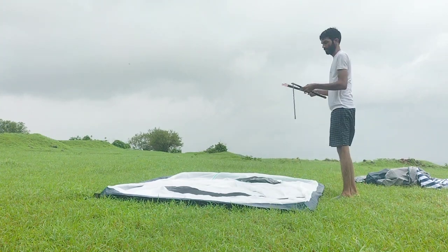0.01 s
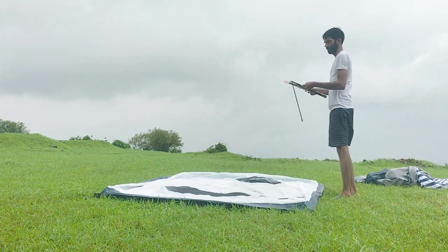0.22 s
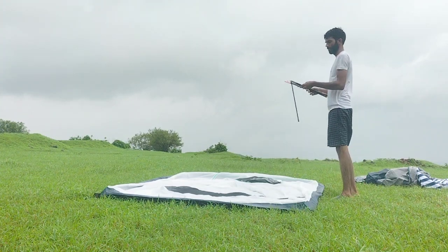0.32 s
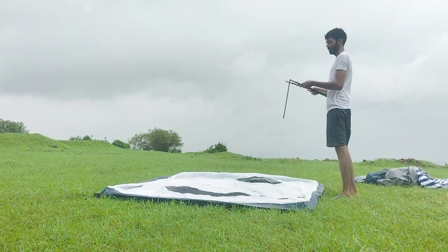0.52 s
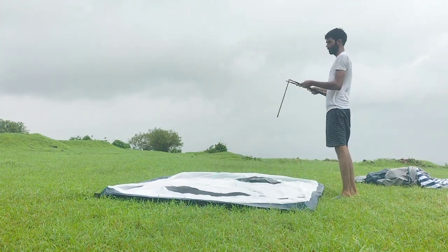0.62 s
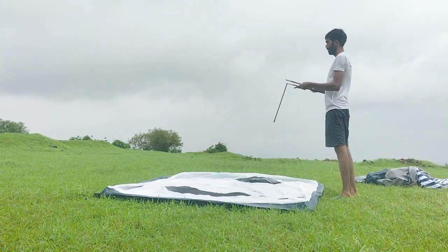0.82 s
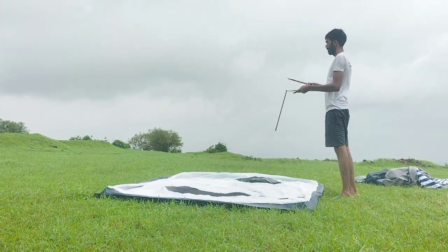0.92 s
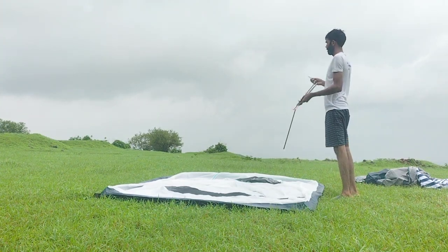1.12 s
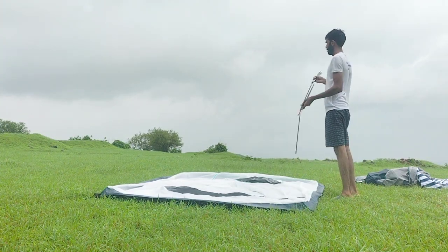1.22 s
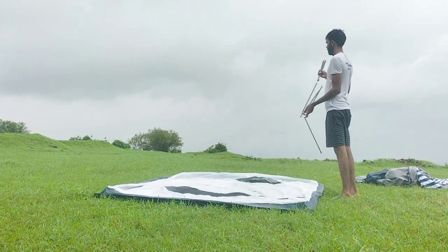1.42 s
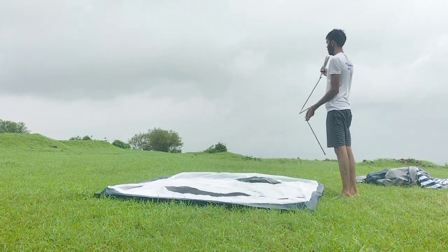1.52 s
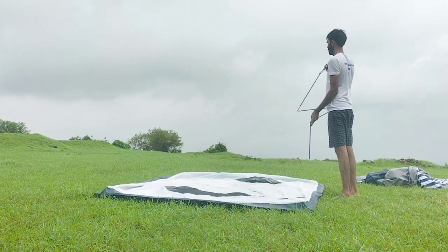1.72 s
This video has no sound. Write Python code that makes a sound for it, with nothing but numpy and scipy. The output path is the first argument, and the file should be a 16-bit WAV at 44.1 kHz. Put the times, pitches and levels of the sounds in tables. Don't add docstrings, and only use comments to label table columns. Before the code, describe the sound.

A sharp, quickly damped click of tent pole tubes with small ticks around it, outdoors at a few metres. A low rumbling wind buffet comes first, and faint bird twitters follow over quiet airy hiss.

```python
import sys
import numpy as np
from scipy import signal
from scipy.fft import rfft, irfft
from scipy.io import wavfile

SR = 44100
rng = np.random.default_rng(int(sys.argv[2]) if len(sys.argv) > 2 else 0)


def volts_from_decibels(level):
    exponent = np.asarray(level, float) / 20
    return 10 ** exponent


def transcribe(u):
    v = np.clip(np.atleast_2d(u).T, -1, 1)
    q = np.round(v * 32767).astype(np.int16)
    wavfile.write(sys.argv[1], SR, q)


N = 79380


def rms_one(x):
    return x / np.sqrt(np.mean(x ** 2) + 1e-20)


def drift(rate):
    step = 40
    r = np.exp(-2 * np.pi * rate * step / SR)
    chance = rng.standard_normal(N // step + 2002)
    slow = signal.lfilter([1], [1, -2 * r, r * r], chance)[2000:]
    return np.interp(np.arange(N) / step, np.arange(len(slow)), rms_one(slow))


def cut(x, hz, kind, order):
    return signal.sosfilt(signal.butter(order, hz, kind, fs=SR, output="sos"), x)


def banded(spectrum, top_hz, patchy_db):
    hz, level_db = np.transpose(spectrum)
    edges = 25 * 2 ** (np.arange(30) / 3)
    white = rng.standard_normal((2, N + SR // 4))
    together = drift(8.4)
    out = 0
    for k, (low, high) in enumerate(zip(edges, edges[1:])):
        if low < top_hz:
            band_pass = signal.butter(2, [low, high], "band", fs=SR, output="sos")
            band = signal.sosfilt(band_pass, white[k % 2])[-N:]
            band_db = np.interp(np.log(low * high) / 2, np.log(hz), level_db)
            flicker = 0.43 * together + drift(9.7)
            out = out + band * volts_from_decibels(band_db + patchy_db * flicker)
    return rms_one(out)


# frequency in Hz, level in dB per Hz.
FIELD_SPECTRUM = [(40, -7.5), (150, -1.5), (330, -3.5), (700, -13.5), (1200, -10.5), (1900, -19),
                  (2700, -14), (3900, -18)]
# time in seconds, level change in dB.
GRASS_STIR = [
    (0, 0),
    (.2, -1.5),
    (.3, 3),
    (.45, 1.5),
    (.6, 0),
    (1.2, 1.5),
    (1.5, 0.5),
    (1.8, -0.5),
]


def field():
    field_db, far_hiss_db, grain_db = -56.5, -81.5, -95.5
    near = cut(banded(FIELD_SPECTRUM, 9000, patchy_db=1.15), 4250, "low", order=10)
    far = cut(rng.standard_normal(N), 5000, "low", order=4)
    far = cut(far, 3800, "high", order=4)
    grain = cut(rng.standard_normal(N), 14500, "low", order=2)
    stir_db = np.interp(np.arange(N) / SR, *np.transpose(GRASS_STIR))
    return volts_from_decibels(field_db + stir_db) * near + volts_from_decibels(far_hiss_db) * rms_one(far) + volts_from_decibels(grain_db) * grain


# time in seconds, peak level in dB, pitch in Hz.
PUFFS = [(.004, -46.5, 122), (0.2044, -18, 195), (.2135, -14.5, 337.7), (0.223, -15, 235),
         (.2285, -20, 411), (.232, -14, 217), (0.236, -23.5, 220), (0.2423, -12, 250), (0.252, -22, 259),
         (.257, -13, 192), (0.2616, -26, 362), (0.2666, -9.5, 217), (0.28, -18, 152.6), (.290, -19, 218),
         (0.2984, -20.5, 228), (0.3109, -21, 181), (0.328, -26.5, 125.4), (0.354, -30.5, 139),
         (.374, -16.5, 203.5), (0.3911, -28.5, 139), (0.412, -40, 123.3), (0.448, -43.5, 98),
         (0.649, -45, 97), (0.678, -49, 79), (.770, -46.5, 111), (1.654, -46, 125), (1.681, -39.5, 106),
         (1.713, -47, 71), (1.730, -49, 68.83), (1.776, -45, 148)]
# time in seconds, level in dB.
GUST = [(0, -57), (.03, -65), (.18, -59.5), (.205, -27), (.27, -28.5), (.34, -48.5), (.40, -47), (.48, -75),
        (.62, -57.5), (.67, -54), (.8, -63.5), (1.58, -68), (1.68, -73), (1.8, -56)]
# frequency in Hz, level in dB per Hz.
RUMBLE_SPECTRUM = [(18, -59.5), (30, -15), (119, 2.5), (172, 5.5), (214, 3), (363, -1), (540, -24),
                   (1000, -48), (1300, -79.5), (2200, -120)]


def wind():
    puff_cycles = 0.46
    t = np.arange(N) / SR
    puffs = np.zeros(N)
    for s, db, hz in PUFFS:
        swell = np.exp(-0.5 * ((t - s) * hz / puff_cycles) ** 2)
        puffs += volts_from_decibels(db) * np.cos(2 * np.pi * hz * (t - s)) * swell
    gust_db = np.interp(t, *np.transpose(GUST))
    return puffs + volts_from_decibels(gust_db) * banded(RUMBLE_SPECTRUM, 1400, patchy_db=3.5)


# frequency in Hz, level in dB, time to fall 60 dB in seconds.
POLE_MODES = [(390, -13.5, 0.057), (900, -63, .02), (1550, 1.5, 0.018), (2067, -6.5, 0.015),
              (4014, -14.5, 0.036), (3534, -5.5, 0.026), (4870, -21, 0.029), (5750, -12, 0.017),
              (6700, -6.5, 0.0057), (8140, -24.5, .012), (9420, -38, 0.045), (11480, -34.5, 0.01),
              (13400, -51, 0.012), (14920, -44, .008)]


def faint_touch(t, tilt_db, rise, end_hz, grip, phase, noise):
    grip_spread_db, damping = 3.0, 1.6
    end_db, end_rises = 1.5, 14
    grit_db, grit_fall_db, grit_rises = -4, -14, 2.0
    hz, level_db, t60 = np.transpose(POLE_MODES)[:, :, None]
    rise = max(rise, 1e-4)

    mode_db = level_db + tilt_db * np.log2(hz / 3500) + grip_spread_db * grip
    mode_fade = volts_from_decibels(mode_db - mode_db.max() - 60 * damping * t / t60)
    body = (mode_fade * np.sin(2 * np.pi * (hz * t + phase))).sum(axis=0)

    end_t60 = end_rises * (rise + 1 / end_hz)
    end = volts_from_decibels(end_db - 60 * t / end_t60) * np.sin(2 * np.pi * end_hz * t)

    bin_hz = np.arange(len(t) // 2 + 1) * SR / len(t)
    octaves = np.log2(np.maximum(bin_hz, 3500) / 3500)
    scrape = irfft(rfft(noise) * volts_from_decibels((tilt_db + grit_fall_db) * octaves))
    grit = volts_from_decibels(grit_db) * rms_one(scrape) * np.exp(-t / (grit_rises * rise))
    return (body + end + grit) * (1 - np.exp(-t / rise)) ** 2


def sharp_snap(t, noise):
    rise_s, held_s = 0.00073, 0.0036
    tail_db, grit_db = -15, -41
    hz, level_db, t60 = np.transpose(POLE_MODES)[:, :, None]
    ring = volts_from_decibels(level_db - 60 * t / t60) * np.sin(2 * np.pi * hz * t)
    grit = volts_from_decibels(grit_db - 60 * t / 0.012) * noise
    snap = -ring.sum(axis=0) + grit
    caught = volts_from_decibels(tail_db) * volts_from_decibels(-60 * t / 0.09) + np.exp(-(t / held_s) ** 4)
    return snap * caught * (1 - np.exp(-t / rise_s)) ** 2


# start in seconds, peak level in dB,
# brightness in dB per octave, rise time in seconds, pitch of the free end in Hz.
KNOCKS = [(0.163, -60.5, 0.5, .001, 5600), (.311, -60, 10, 0.00016, 5550),
          (.3832, -50.5, 3.5, .00015, 5500), (.499, -73, 7, 0.0024, 11750),
          (0.506, -54.5, 20, 0.0011, 5590), (.9762, -39, 3, 0.00094, 1980),
          (0.9857, -44.5, 8, 0.00049, 11900), (1.0015, -78, 3, 0.00066, 11700),
          (1.0155, -80, 8, .0002, 10500), (1.096, -47, -2, .0007, 900), (1.096, -58, -3, 0.00038, 6700),
          (1.101, -57.5, 5.5, .0005, 6700), (1.136, -42, -3, 0.00049, 900), (1.137, -56, 4, 0.00034, 9000),
          (1.145, -50.5, -22, .001, 1150), (1.180, -79, 9, .0002, 11750), (1.199, -72, 9, 0.00025, 6700),
          (1.377, -63, 11, 0.0009, 7000), (1.385, -76, 8, .001, 9500), (1.438, -77, 8, .001, 11750),
          (1.617, -48.5, 5, 0.0014, 2346), (1.622, -60, 10, 0.0018, 4870),
          (1.620, -62.5, 17, 0.0013, 11500), (1.640, -73, 12, .0002, 11750), (1.680, -78, 12, .0005, 11600)]


def poles():
    t = np.arange(1024) / SR
    chance = rng.standard_normal((len(KNOCKS), 2, len(POLE_MODES), 1))
    white = rng.standard_normal((len(KNOCKS) + 1, len(t)))
    hits = [(0.9847, -18.5, sharp_snap(t, white[-1]))]
    for (s, db, tilt_db, rise, end_hz), (grip, phase), noise in zip(KNOCKS, chance, white):
        hits.append((s, db, faint_touch(t, tilt_db, rise, end_hz, grip, phase, noise)))
    out = np.zeros(N + 4096)
    for s, db, hit in hits:
        i = int(s * SR)
        out[i:i + len(hit)] += volts_from_decibels(db) * hit / np.abs(hit).max()
    return out[:N]


# start in seconds, length in seconds, first pitch in Hz, last pitch in Hz,
# level in dB.
BIRD_NOTES = [(1.019, 0.012, 6300, 5160, -60), (1.062, .014, 6160, 4360, -68),
              (1.118, 0.0137, 4270, 5220, -59), (1.373, 0.013, 6070, 3700, -58.5),
              (1.412, .024, 7300, 3500, -59), (1.451, .008, 4100, 6300, -61),
              (1.461, .016, 6300, 3700, -60), (1.491, .044, 3200, 5450, -58),
              (1.498, .011, 3400, 3850, -52), (1.516, .019, 4750, 5350, -49),
              (1.539, .009, 4400, 3600, -55), (1.551, .011, 4400, 3300, -57),
              (1.563, .007, 3200, 2900, -60), (1.763, 0.0034, 6200, 5351, -60.5)]


def bird():
    glide_bend = 0.8
    echo_s, echo_db = 0.017, -22
    dull_hz, flutter_db = 4900, 2
    out = np.zeros(N + SR)
    for s, length, from_hz, to_hz, db in BIRD_NOTES:
        u = np.linspace(0, 1, int(length * SR))
        glide = u + glide_bend * ((1 - np.cos(np.pi * u)) / 2 - u)
        pitch_hz = from_hz + (to_hz - from_hz) * glide
        tone = np.sin(2 * np.pi * np.cumsum(pitch_hz) / SR)
        i = int(s * SR)
        out[i:i + len(u)] += volts_from_decibels(db) * np.sin(np.pi * u) ** 0.35 * tone
    echoed = out + volts_from_decibels(echo_db) * np.roll(out, int(echo_s * SR))
    return cut(echoed, dull_hz, "low", order=4)[:N] * volts_from_decibels(flutter_db * drift(60))


def scene():
    return (wind() + poles() + bird() + field())[None]


def low_pass(x):
    return signal.sosfilt(signal.butter(12, 15600, fs=SR, output="sos"), x)


def record(dry):
    return low_pass(dry)


dry = scene()
out = record(dry)
transcribe(out)
```